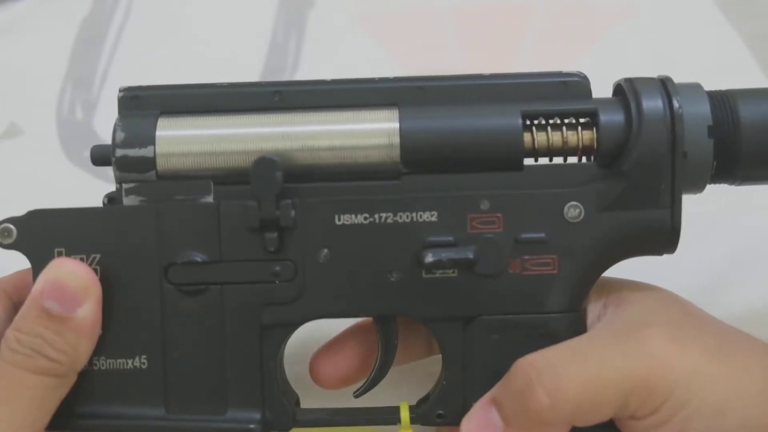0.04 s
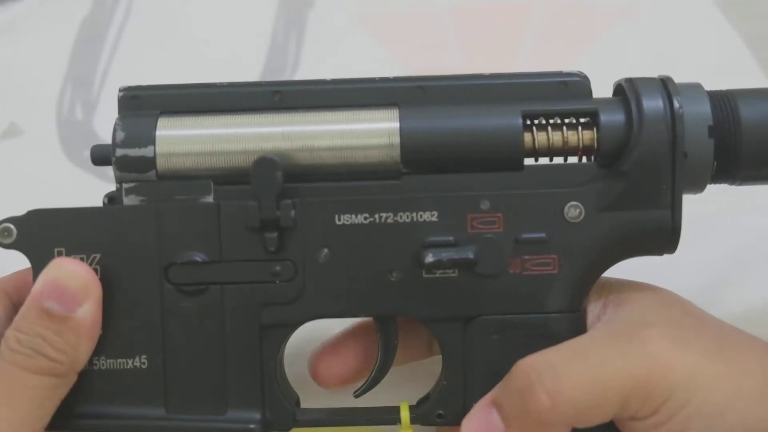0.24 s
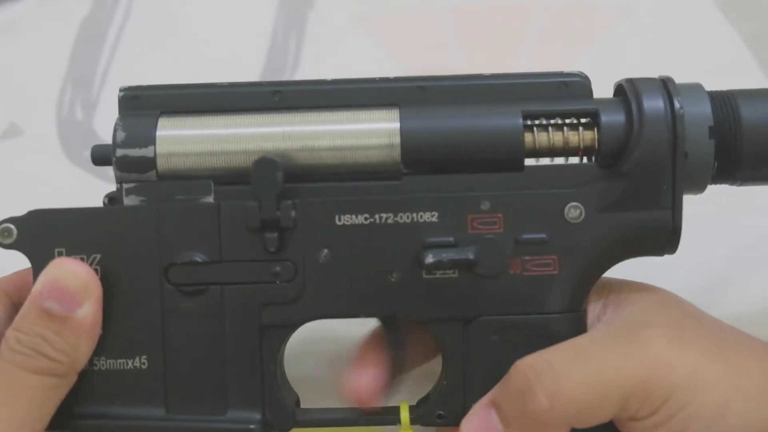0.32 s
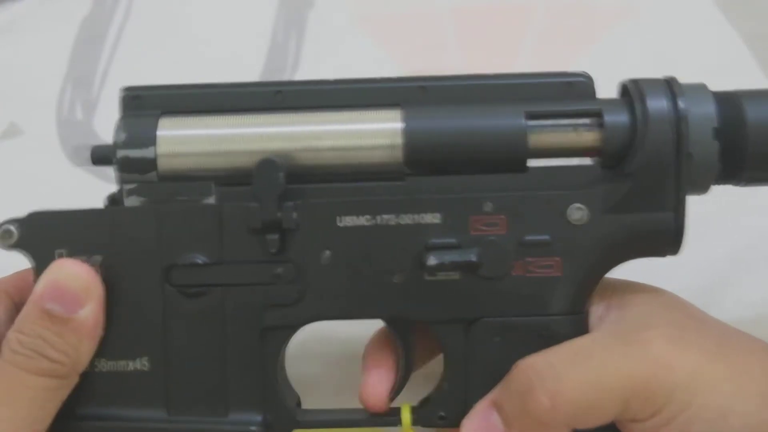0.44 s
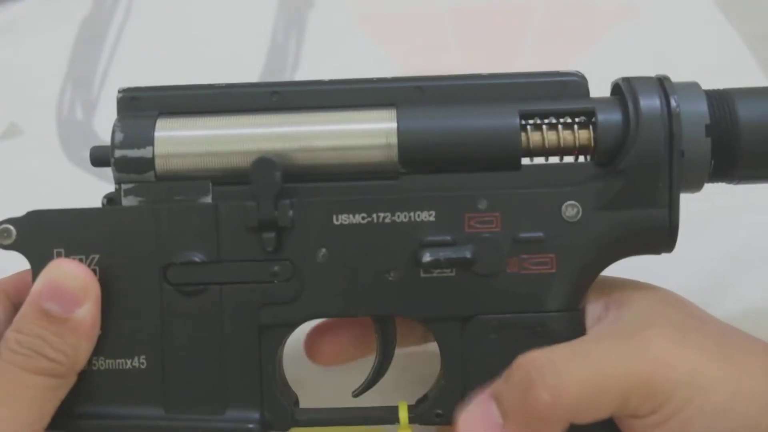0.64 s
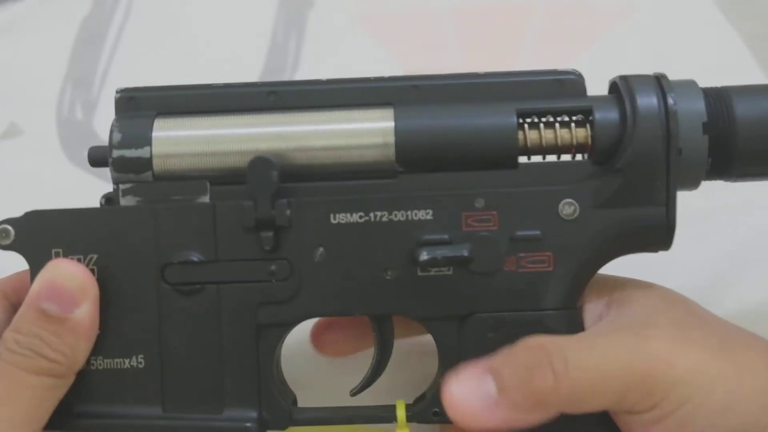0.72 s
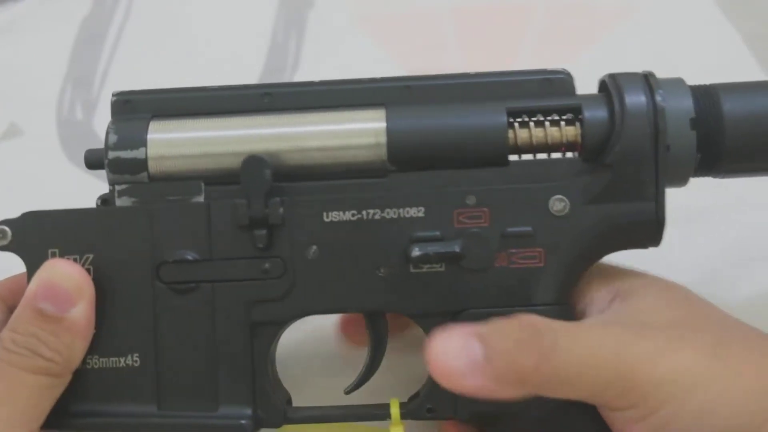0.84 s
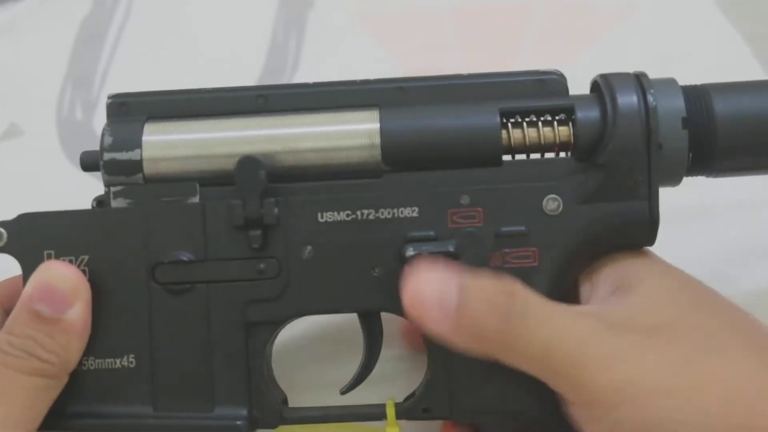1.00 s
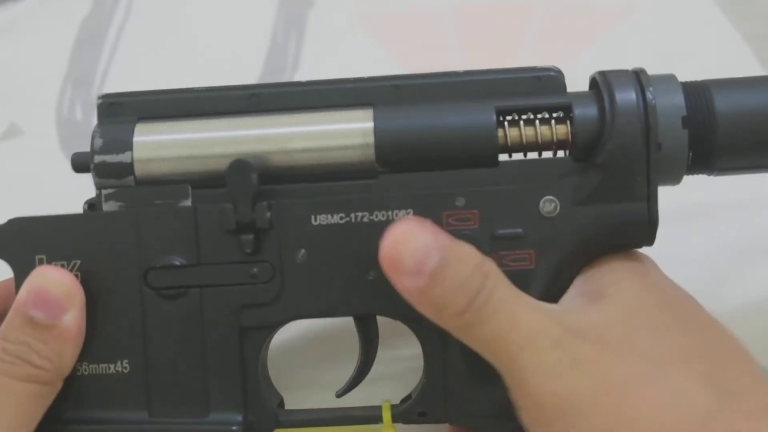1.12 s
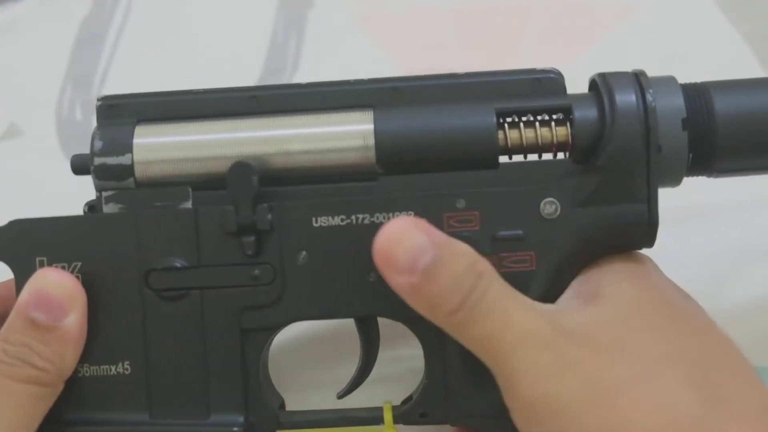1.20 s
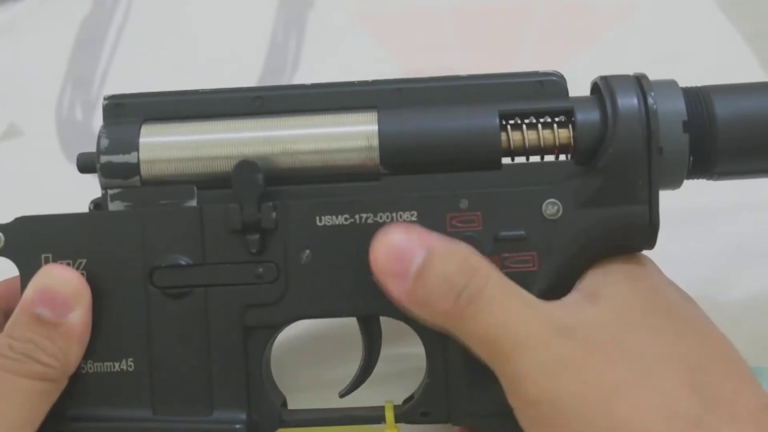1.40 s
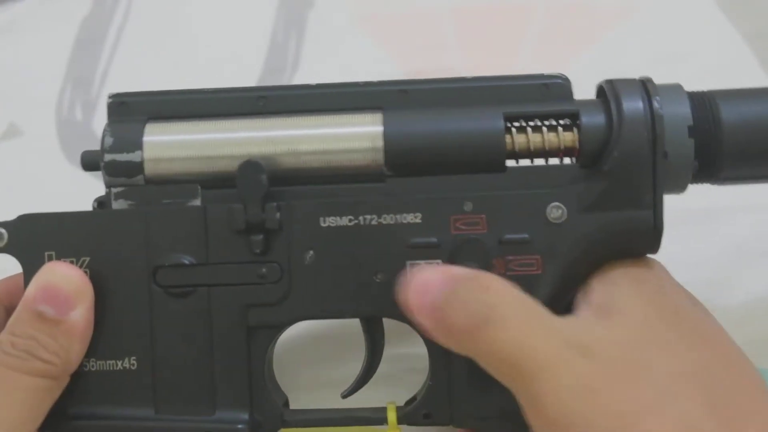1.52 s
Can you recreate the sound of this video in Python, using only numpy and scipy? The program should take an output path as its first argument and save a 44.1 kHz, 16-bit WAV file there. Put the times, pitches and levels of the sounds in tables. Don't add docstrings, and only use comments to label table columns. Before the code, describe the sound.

An electric toy rifle gearbox, heard very close in a small hard room. After quiet low room tone, the motor starts abruptly at 0.21 s with bright grinding gears. Four harsh, clipped metallic slams follow from 0.27 to 0.44 s, bouncing and knocking. The motor whirs down, dull and fading, until about 0.9 s. Sharp plastic selector clicks come at 1.26 and 1.43 s, with faint scraping and a last small tick at 1.5 s.

```python
import sys
import numpy as np
from scipy import signal
from scipy.fft import rfft, irfft
from scipy.io import wavfile
from scipy.ndimage import uniform_filter1d

SR = 44100
rng = np.random.default_rng(int(sys.argv[2]) if len(sys.argv) > 2 else 0)


def digitize_waveform(pressure):
    field = np.atleast_2d(pressure).T
    bounded = np.clip(field, -1, 1)
    quanta = np.round(bounded * 32767).astype(np.int16)
    wavfile.write(sys.argv[1], SR, quanta)


def nominal_scale(level):
    x = np.asarray(level, float) / 20
    return 10 ** x


N = 68355

# pitch_hz, level_db
FLOOR_TONE = [(26, -44), (45, -5), (311, -4.5), (437, -7), (631, -8.5), (768, -11.5), (826, -11.5),
              (3760, -20.5), (15500, -39.5)]
# start_s, level_db
FLOOR_DRIFT = [
    (0, 1),
    (.1, 3.5),
    (.9, 2.5),
    (1.218, 2),
    (1.55, 3),
]
# pitch_hz, likeness (0-1)
FLOOR_LIKENESS = [(30, 0.56), (100, 0.57), (250, 0.22), (1000, 0.18), (4000, 0.036), (15000, .2)]
# pitch_hz, likeness (0-1)
NOISE_LIKENESS = [(60, 1), (250, 1), (600, 0.98), (1200, 1), (2500, 0.4), (5000, 0.5), (12000, 0.15)]
# pitch_hz, likeness (0-1)
KNOCK_LIKENESS = [(500, 0.57), (2000, 1), (9000, 1)]
# pitch_hz, left_minus_right_db
STEREO_LEAN = [(60, 0.5), (240, -0.5), (950, -0.5), (3770, 1), (15000, 1.0)]
# pitch_hz, t60_s
ROOM_DECAY = [(250, 0.21), (1000, 0.65), (4000, 0.087), (12000, 0.54)]

# start_s, level_db
THUMB_RUB = [
    (1.262, -68),
    (1.27, -56),
    (1.3, -50),
    (1.36, -55),
    (1.42, -46),
    (1.445, -49),
    (1.48, -56),
    (1.55, -60),
]
# pitch_hz, level_db, t60_s
LEVER_RING = [(1816, 0, 0.026), (2530, -2, 0.02), (3760, -5, 0.016)]
# start_s, level_db, t60_s, rise_s
SHIVERS = [
    (1.263, -36.5, 0.21, 0.0019),
    (1.309, -52.5, 0.67, .004),
    (1.339, -47, 0.8, 0.046),
    (1.394, -45, 0.6, 0.018),
    (1.429, -25.5, 0.06, 0.00067),
    (1.4396, -34.5, 0.29, 0.0016),
    (1.497, -64, 0.22, .002),
]
# pitch_hz, level_db
SHIVER_COLOUR = [(1300, -35), (2200, -12), (3900, -13.5), (5400, -7), (6800, -5.5), (8200, -12.5),
                 (11000, -16), (15500, -24)]
# start_s, level_db, pitch_hz, bright_share_db, t60_s
SELECTOR_TICKS = [(1.0278, -44, 1800, -20, .01), (1.2631, -14.5, 2530, -7, .0095),
                  (1.2738, -40, 2500, 0, .014), (1.2855, -44, 2500, 2, .014),
                  (1.3105, -37, 2400, -14, .012), (1.3148, -40, 2300, -20, .014),
                  (1.377, -43, 2400, -14, .015), (1.135, -47, 3750, -30, .03),
                  (1.4962, -29, 1930, -16, .016), (1.4963, -35, 2550, -14, .012),
                  (1.501, -40, 1880, -20, .022), (1.4230, -39, 2500, -20, .01),
                  (1.4278, -35, 2400, 3, .008), (1.4293, -18.5, 2420, -1, .012),
                  (1.4318, -30, 2500, -5, .014), (1.4345, -30, 2300, -4, .010),
                  (1.4398, -38, 2300, 4, .012)]
# share_of_pitch, level_db, ring_factor
TICK_BODY = [(.745, -4, 1.6), (1., -1, 1.25), (1.16, -8, 1.2)]
# pitch_hz, level_db
SNAP_OUT = [(4060, 1), (5250, -1), (6300, -7), (7270, -5), (8740, -11), (11100, -11)]
# pitch_hz, level_db
SNAP_BACK = [(3300, -8), (4200, -7), (5230, -1), (5750, -2), (7150, -3), (8170, -8), (9050, -4),
             (10500, -10), (12100, -6), (13200, -6), (14600, -9)]

# start_s, level_db
COAST_HUM = [
    (0.499, -51),
    (.56, -49.5),
    (.67, -48.5),
    (.74, -91),
]
# pitch_hz, level_db, t60_s
STOCK_THUMP = [(178.5, -33.5, 0.17), (249, -28.5, 0.12), (303, -18.5, 0.027), (61, -41.5, 0.16)]
# pitch_hz, level_db, t60_s
SHELL_MODES = [(740, -5, .025), (925, -1, .035), (1085, -1, .03), (1335, -1, .035), (1600, -2, .03),
               (1770, -1, .03), (1980, -3, .025), (2300, -2, .025), (2650, -4, .02), (3120, -3, .02),
               (3460, -3, .025), (4550, 0, .025), (5700, -9, .02), (9000, -9, .015)]
# start_s, level_db, tilt_db_per_octave
SHELL_KNOCKS = [(.2712, -13, 0), (.2735, -14.5, 0), (.2828, -17, -1), (.300, -21, -3), (.310, -22, 2),
                (.3283, -12, -1), (.3343, -13, -1), (.339, -14.5, 2), (.3845, -13, 0), (.390, -14, -2),
                (.3995, -16, 2), (.4415, -13, -1), (.4475, -14, -2), (.471, -20, -3), (.5105, -26, 0),
                (.551, -28, -2), (.657, -32, -3), (.700, -36, -3), (.791, -43, 1)]
# start_s, level_db
PISTON_SLAMS = [
    (.271, -12.5),
    (.328, -11),
    (0.3846, -11),
    (0.4413, -13.5),
]
# delay_s, level_db
PISTON_BOUNCES = [
    (0, -1),
    (.0055, -9),
    (.011, -7),
    (0.023, -9.5),
]
# pitch_hz, level_db
SLAM_COLOUR = [(180, -28.5), (300, -35.5), (509, -13), (969, 5.5), (3950, -5), (4500, -5), (5670, -11.5),
               (9010, -7), (15500, -20)]
# start_s, level_db, teeth_per_s, dullness (0-1)
MOTOR_DRIVE = [(.2105, -68, 1546, 1), (0.2146, -16, 1467, 0.16), (.235, -16.5, 1486, 0),
               (.268, -16, 1725, 0.19), (.452, -15, 1800, 0.04), (.462, -18.5, 1700, 0.24),
               (.5, -28.5, 1500, 0.54), (.62, -28, 1200, 0.79), (0.699, -36.5, 780, 0.59),
               (.78, -46.5, 524, 0.66), (0.949, -61, 228, 1)]
# pitch_hz, level_db
LOADED_COLOUR = [(180, -55.5), (300, -19.5), (760, -22.5), (1150, -20.5), (1640, -6), (3130, -2.5),
                 (6690, -14), (9950, -15), (15500, -31.5)]
# pitch_hz, level_db
COASTING_COLOUR = [(180, -57), (300, -4.5), (600, -21.5), (1070, -9.5), (1180, -4), (3000, -9.5),
                   (5000, -11.5), (10500, -19), (13000, -30.5)]
# pitch_hz, power_share_db, t60_s
COASTING_RINGS = [(740, -19, .05), (1070, -6, .045), (1740, -12, .04), (2010, -12, .05), (2830, -12, .03)]
# start_s, end_s, above_hz
TREBLE_GAPS = [
    (.199, .2105, 1000),
    (1.245, 1.2585, 2600),
    (1.2585, 1.30, 13500),
]

SPRING_MODE = (4550, -14, .02)  # pitch_hz, power_share_db, t60_s
LEVER_MODE = (9100, -17, .019)  # pitch_hz, power_share_db, t60_s
KNOCK_RISE_S = .0006


def evened(x):
    return x / np.sqrt(np.mean(x ** 2) + 1e-20)


def read(points, hz):
    f, value = np.transpose(points)
    return np.interp(np.log(hz + 1), np.log(f + 1), value)


def envelope(points):
    s, db = np.transpose(points)
    return nominal_scale(np.interp(np.arange(N) / SR, s, db, left=-200))


def add(mix, s, sound):
    part = mix[round(s * SR):][:len(sound)]
    part += sound[:len(part)]


def faded_in(ring, rise_s):
    return ring * np.minimum(np.arange(len(ring)) / SR / rise_s, 1)


def passed(x, hz, kind, order=3):
    return signal.sosfilt(signal.butter(order, hz, kind, fs=SR, output="sos"), x)


def colour(x, points):
    logs = np.log(nominal_scale(np.maximum(read(points, np.fft.rfftfreq(2048, 1 / SR)), -80)))
    full = np.r_[logs, logs[-2:0:-1]]
    minimum_phase = np.exp(full - 1j * signal.hilbert(full).imag)
    taps = np.fft.ifft(minimum_phase).real[:1024]
    return signal.oaconvolve(x, taps / np.linalg.norm(taps))[:len(x)]


def rings(modes, length=0.13):
    t = np.arange(0, length, 1 / SR)
    out = np.zeros(len(t))
    for k, (hz, db, t60) in enumerate(modes):
        out += (-1) ** k * nominal_scale(db - 60 * t / t60) * np.sin(2 * np.pi * hz * t)
    return out


def singing(x, hz, db, t60):
    t = np.arange(0, .06, 1 / SR)
    mode = nominal_scale(-60 * t / t60) * np.cos(2 * np.pi * hz * t)
    ring = signal.oaconvolve(x, mode)[:len(x)]
    return x + nominal_scale(db) * ring * np.linalg.norm(x) / np.linalg.norm(ring)


def shell(x):
    ring = rings(SHELL_MODES)
    return signal.oaconvolve(x, ring / np.linalg.norm(ring))[:len(x)]


def pair(a, b, likeness):
    hz = np.fft.rfftfreq(N, 1 / SR)
    same = np.clip(read(likeness, hz), -1, 1)
    lean = nominal_scale(read(STEREO_LEAN, hz) / 2)
    left = rfft(a) * lean
    right = (same * rfft(a) + np.sqrt(1 - same ** 2) * rfft(b)) / lean
    return np.array([irfft(left, N), irfft(right, N)])


def floor():
    a, b = rng.standard_normal((2, N))
    shape = nominal_scale(read(FLOOR_TONE, np.fft.rfftfreq(N, 1 / SR)))
    tone = irfft(rfft(pair(a, b, FLOOR_LIKENESS)) * shape, N)
    return evened(tone) * nominal_scale(-49.5) * envelope(FLOOR_DRIFT)


def tails(count, start_s, stretch):
    taps = np.zeros((count, SR // 2))
    grid = np.arange(0, SR // 2 - 20, 20)
    at = grid + rng.integers(0, 20, (count, len(grid)))
    np.put_along_axis(taps, at, rng.choice([-1., 1.], at.shape), 1)
    hz, t, z = signal.stft(taps, SR, nperseg=128)
    decay = nominal_scale(-60 * t / (stretch * read(ROOM_DECAY, hz)[:, None]))
    tail = signal.istft(z * decay, SR, nperseg=128)[1]
    return np.pad(tail / np.linalg.norm(tail[0]), ((0, 0), (round(start_s * SR), 0)))


def heard(x, room_db):
    room = signal.fftconvolve(x, tails(count=2, start_s=.008, stretch=0.6), axes=1)[:, :N]
    return x + nominal_scale(room_db) * room


def thumb():
    grains = np.minimum(rng.exponential(1, N // 90 + 1), 3).repeat(90)[:N]
    grit = rng.standard_normal(N) * nominal_scale(3.5 * grains)
    ring = evened(signal.oaconvolve(grit, rings(LEVER_RING, length=.05))[:N])
    return ring * envelope(THUMB_RUB)


def rattle():
    out, t = np.zeros(N), np.arange(0, .2, 1 / SR)
    for s, db, t60, rise in SHIVERS:
        noise = rng.standard_normal(len(t))
        grains = np.minimum(rng.exponential(1, len(t) // 60 + 1), 2).repeat(60)[:len(t)]
        grit = noise * nominal_scale(1.5 * grains - 6.5)
        fade = np.minimum(t / rise, 1) * np.minimum((t[-1] - t) / 0.13, 1)
        add(out, s, grit * nominal_scale(db - 60 * t / t60) * fade)
    return singing(colour(out, SHIVER_COLOUR), *LEVER_MODE)


def selector():
    out = np.zeros(N)
    lands_s, snap_shorter, dull_tilt = 1.4, .6, .15
    for s, db, hz, bright_db, t60 in SELECTOR_TICKS:
        modes = [(hz * share, d, t60 * longer) for share, d, longer in TICK_BODY]
        for f, d in (SNAP_OUT if s < lands_s else SNAP_BACK):
            tilt_db = min(bright_db, 0) * dull_tilt * np.log2(f / SNAP_OUT[0][0])
            modes.append((f, d + bright_db + tilt_db, t60 * snap_shorter))
        add(out, s, nominal_scale(db) * faded_in(rings(modes, length=.04), KNOCK_RISE_S))
    return passed(out, 1550, "highpass")


def ticks_in_stereo():
    ticks = selector()
    same, pan_db = .9, 1.2
    turned = same * ticks + np.sqrt(1 - same ** 2) * signal.hilbert(ticks).imag
    return np.array([ticks * nominal_scale(pan_db / 2), turned / nominal_scale(pan_db / 2)])


def thumps():
    out = np.zeros(N)
    thump = faded_in(rings(STOCK_THUMP), .0023)
    add(out, .212, nominal_scale(-9.5) * thump)
    for s, db in PISTON_SLAMS:
        add(out, s - .004, thump)
    s, db = np.transpose(COAST_HUM)
    hum = evened(passed(rng.standard_normal(N), (47, 114), "bandpass", order=2))
    return out + hum * nominal_scale(np.interp(np.arange(N) / SR, s, db, left=-200, right=-200))


def knocks():
    out = np.zeros(N)
    shorter, spread_db, detune = .75, 2.5, .03
    chance = rng.standard_normal((len(SHELL_KNOCKS), 2, len(SHELL_MODES)))
    for (s, db, tilt_db), (gains, shifts) in zip(SHELL_KNOCKS, chance):
        modes = []
        for (hz, mode_db, t60), gain, shift in zip(SHELL_MODES, gains, shifts):
            mode_db = mode_db + spread_db * gain + tilt_db * np.log2(hz / 2000)
            modes.append((hz * (1 + detune * shift), mode_db, t60 * shorter))
        add(out, s, nominal_scale(db) * faded_in(rings(modes, length=.05), KNOCK_RISE_S))
    return out


def piston():
    cracks, t = np.zeros(N), np.arange(0, .2, 1 / SR)
    body_t60_s, strike_db, strike_t60_s, tail_db, tail_t60_s = .027, -3, .0019, -10.5, .3
    for s, db in PISTON_SLAMS:
        for delay, bounce_db in PISTON_BOUNCES:
            blow = nominal_scale(-60 * t / body_t60_s) + nominal_scale(strike_db - 60 * t / strike_t60_s)
            crack = faded_in(blow, .00031) * rng.standard_normal(len(t))
            add(cracks, s + delay, nominal_scale(db + bounce_db) * crack)
        add(cracks, s, nominal_scale(db + tail_db - 60 * t / tail_t60_s) * rng.standard_normal(len(t)))
    return 2 * (singing(colour(cracks, SLAM_COLOUR), *SPRING_MODE) + nominal_scale(-21.5) * shell(cracks))


def gears():
    t = np.arange(N) / SR
    s, level_db, rate, dull = np.transpose(MOTOR_DRIVE)
    jitter, spread_db, hiss_db, ring_db = .45, 1.8, -5, -8
    turns = np.cumsum(np.interp(t, s, rate)) / SR
    turns = turns + jitter * evened(uniform_filter1d(rng.standard_normal(N), size=24))
    teeth = np.diff(np.floor(np.maximum.accumulate(turns)), prepend=0) > 0
    ticks = teeth * nominal_scale(spread_db * np.minimum(rng.exponential(1, N), 4)) * rng.choice([-1, 1], N)
    ticks = ticks / np.sqrt(uniform_filter1d(ticks ** 2, size=3000) + 1e-9)
    level = nominal_scale(np.interp(t, s, level_db, left=-200, right=-200))
    drive = (ticks + nominal_scale(hiss_db) * rng.standard_normal(N)) * level
    dull = np.clip(np.interp(t, s, dull), 0, 1)
    loaded = singing(colour(drive * np.sqrt(1 - dull), LOADED_COLOUR), *SPRING_MODE)
    free = colour(drive * np.sqrt(dull), COASTING_COLOUR)
    for mode in COASTING_RINGS:
        free = singing(free, *mode)
    ringing = nominal_scale(ring_db) * shell(drive * np.sqrt(0.051 + dull))
    return loaded + passed(free, 13800, "lowpass") + ringing


def scene():
    knock = knocks()
    gearbox = pair(gears() + piston(), gears() + piston(), NOISE_LIKENESS)
    gearbox = gearbox + pair(knock, signal.hilbert(knock).imag, KNOCK_LIKENESS)
    lever = ticks_in_stereo() + pair(rattle() + thumb(), rattle() + thumb(), NOISE_LIKENESS)
    stock = np.tile(thumps(), (2, 1))
    mix = heard(passed(gearbox, 517, "highpass"), room_db=-8)
    mix = mix + heard(stock, room_db=-12.5)
    mix = mix + heard(lever, room_db=-17)
    return mix + floor()


def top_cut(x):
    return signal.sosfilt(signal.butter(12, 15690, fs=SR, output="sos"), x)


def record(dry):
    t, out = np.arange(N) / SR, dry
    for start, end, hz in TREBLE_GAPS:
        gap = np.clip(np.minimum(t - start, end - t) / .001, 0, 1)
        lowpass = signal.firwin(301, hz, window=("kaiser", 8), fs=SR)
        low = signal.oaconvolve(out, lowpass[None], "same")
        out = out + gap * (low - out)
    return top_cut(np.clip(out, -.95, .95))


dry = scene()
out = record(dry)
digitize_waveform(out)
```